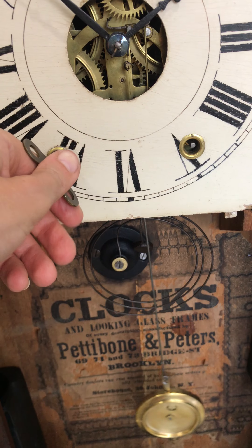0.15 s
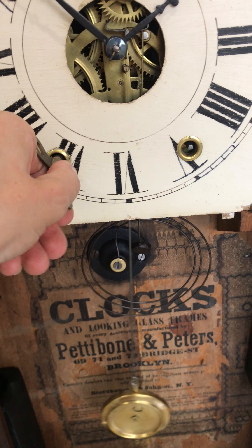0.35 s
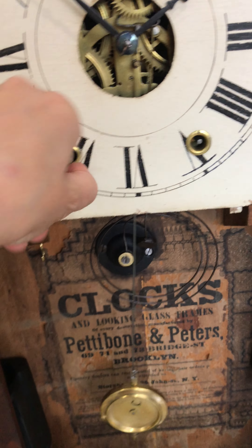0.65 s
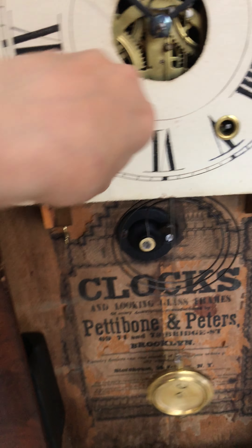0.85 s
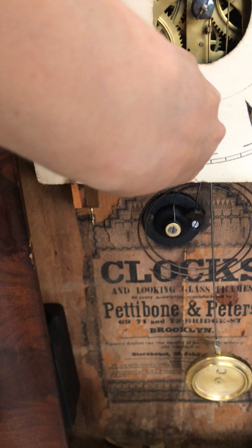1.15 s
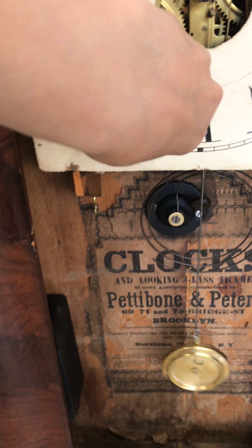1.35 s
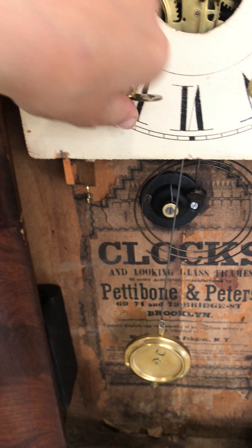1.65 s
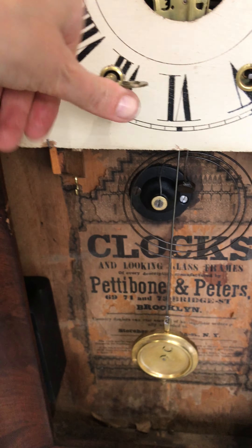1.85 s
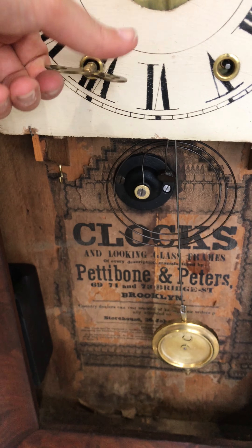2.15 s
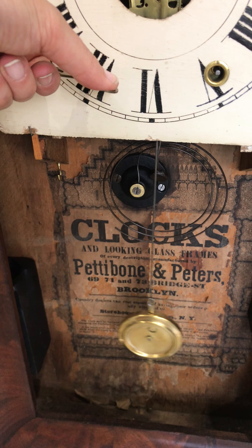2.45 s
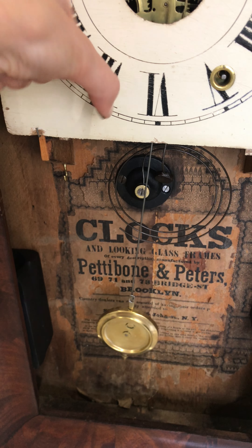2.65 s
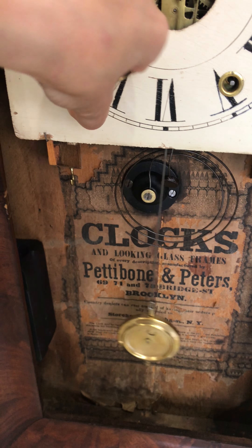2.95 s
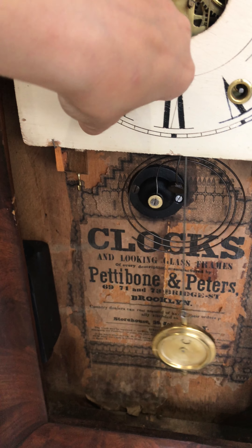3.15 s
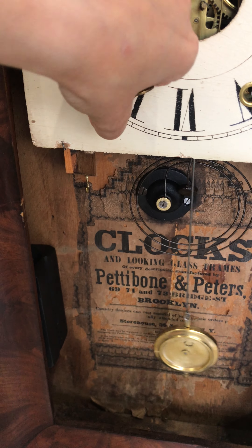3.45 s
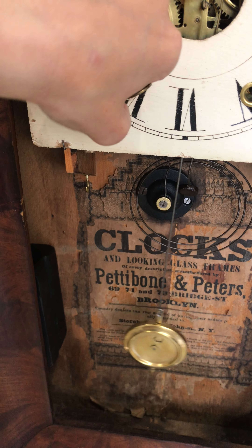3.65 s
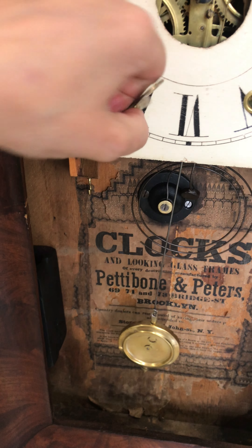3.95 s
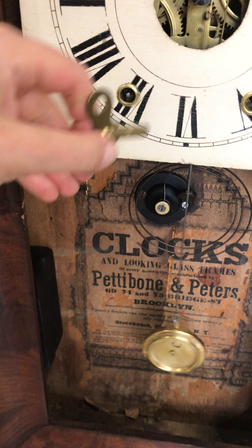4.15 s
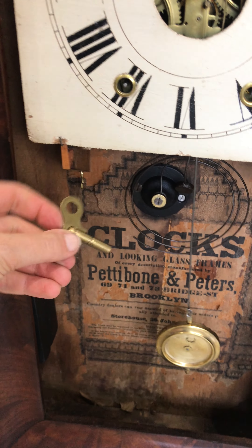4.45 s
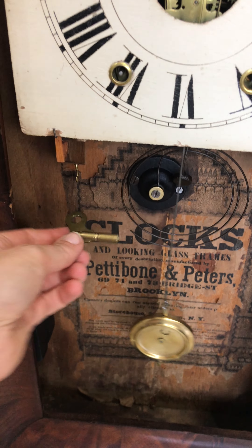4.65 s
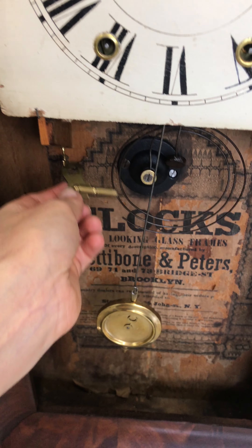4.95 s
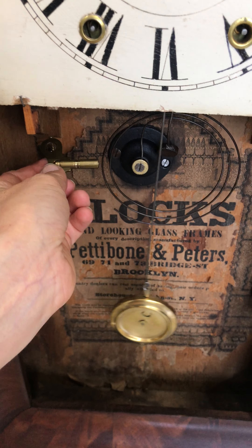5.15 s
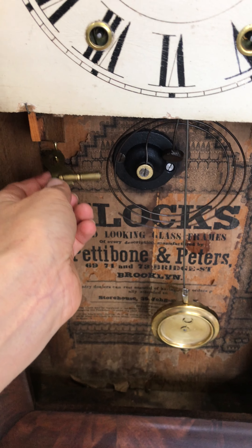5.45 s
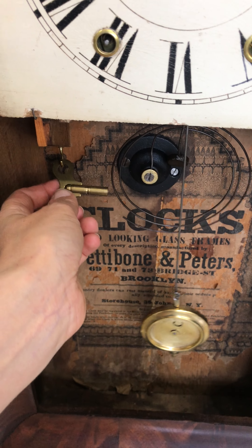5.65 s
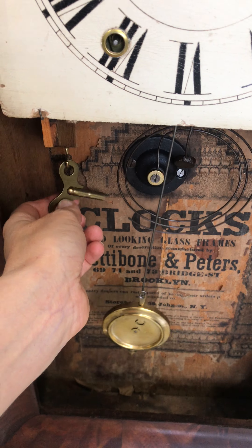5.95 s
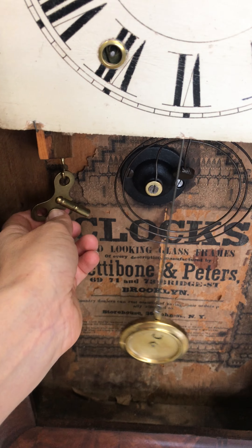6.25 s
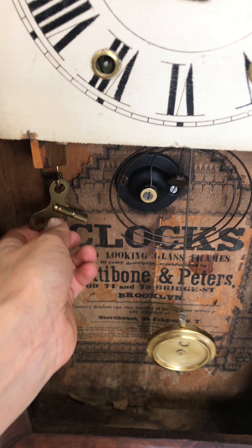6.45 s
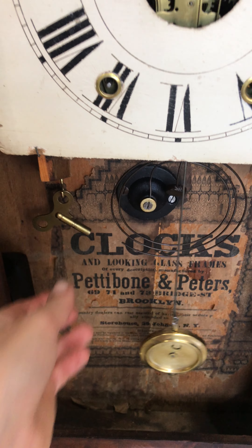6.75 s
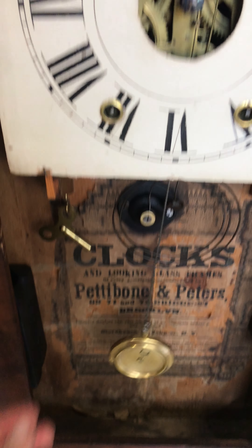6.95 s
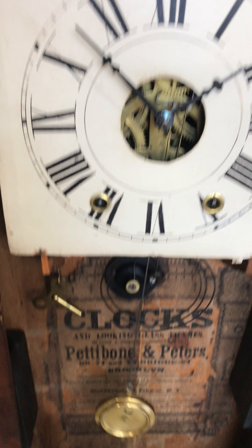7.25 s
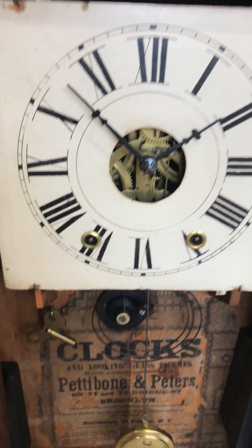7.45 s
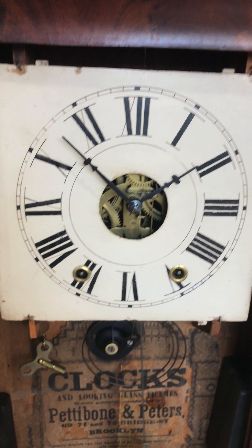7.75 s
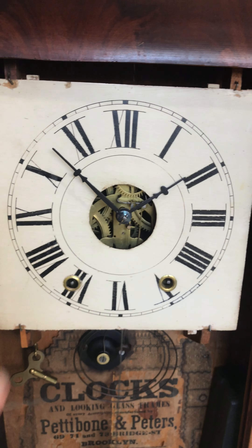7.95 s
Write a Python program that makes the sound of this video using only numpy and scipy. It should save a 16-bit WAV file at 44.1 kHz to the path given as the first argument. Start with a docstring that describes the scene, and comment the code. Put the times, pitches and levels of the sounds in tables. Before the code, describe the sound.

Close metallic knocks and rapid ratchet clicks from winding a wall clock, a sharp bang, then the key clinks and scrapes onto a hook.

```python
"""A key knocks on its arbor, close by, then an old pendulum wall clock ticks in a quiet room as it is wound.
The pawl clicks over the ratchet in two runs; after the second the loaded wheel falls back on it with a bang.
The key slides off and is hung with some scraping on a hook inside the wooden case.
Blows are damped sines plus dense decaying noise, friction is coloured noise and the squeak a wavering sine;
the case and the room answer with decaying noise echoes, over the rumble and hiss of the house."""
import sys
import numpy as np
from scipy import signal
from scipy.fft import rfft, irfft, next_fast_len
from scipy.io import wavfile
from scipy.ndimage import map_coordinates

SR = 44100
rng = np.random.default_rng(int(sys.argv[2]) if len(sys.argv) > 2 else 0)


def int16_out(signal):
    """Quantize to a 16-bit WAV file."""
    q = np.round(np.clip(np.atleast_2d(signal).T, -1, 1) * 32767)
    wavfile.write(sys.argv[1], SR, q.astype(np.int16))


N = 357632  # length in samples

# Resonances of the key on its arbor: pitch_hz, width_hz (before damping), peak_db (before random scatter)
KEY_MODES = [(197.5, 15, -7), (406, 110, 1), (880, 19, -9), (1146, 140, -5.5), (1740, 20, 1),
             (1895, 21, -7), (2102, 130, -11.5), (3200, 43, -14), (3760, 26, -27)]
# Spectrum of the key's dense weaker modes: pitch_hz, relative density_db
KEY_BODY = [(90, -40.5), (180, -6.5), (360, -1), (560, -11), (900, -7.5), (1750, -15.5), (2200, -16),
            (2800, -21.5), (4200, -24), (7000, -26.5), (10000, -32.5), (16000, -37)]


def amp(db):
    """Decibels to gain."""
    return 10 ** (np.asarray(db) / 20)


def unit(x):
    """Scale to rms 1."""
    return x / np.sqrt(np.mean(x ** 2) + 1e-20)


def along(points, hz):
    """Interpolate (Hz, value) points on a log frequency axis."""
    f, v = np.transpose(points)
    return np.interp(np.log(hz + 1), np.log(f + 1), v)


def level(spells, rise_db_per_s, fall_db_per_s):
    """Gain per sample: each spell swells, holds and dies away."""
    t = np.arange(N) / SR
    gain = np.zeros(N)
    for start, length, db in spells:
        before = np.maximum(start - t, 0)
        after = np.maximum(t - start - length, 0)
        gain += amp(db - rise_db_per_s * before - fall_db_per_s * after)
    return gain


def wobble(rate):
    """A smooth random curve, rate knots a second."""
    knots = rng.standard_normal(int(N * rate / SR) + 4)
    return map_coordinates(knots, [np.arange(N) * rate / SR])


def coloured(x, spectrum):
    """Pass x through a causal minimum-phase filter with the given (Hz, dB) spectrum."""
    size = 2 * next_fast_len(len(x) // 2 + 2048)
    gain = amp(along(spectrum, np.fft.rfftfreq(size, 1 / SR)))
    cepstrum = irfft(np.log(gain + 1e-6))
    # Folding the cepstrum onto positive time makes the filter causal
    cepstrum[1:size // 2] *= 2
    cepstrum[size // 2 + 1:] = 0
    return irfft(rfft(x, size) * np.exp(rfft(cepstrum)))[:len(x)]


def add(track, s, sound):
    """Mix a sound in at time s."""
    part = track[max(round(s * SR), 0):][:len(sound)]
    part += sound[:len(part)]


def shared(share, s, db, bright_db=0, thud=1):
    """A blow as (s, case dB, plates dB, steel dB); thud is the dB the wood gains per dB the steel loses."""
    wood, brass, steel = share
    return s, db + wood - thud * bright_db, db + brass, db + steel + bright_db


def blows(rows, modes, body, tone_db, damping_hz, detune, chatter, t60s, rise, lag, gain_db):
    """Each blow starts in the steel and reaches the brass plates and then the case a little later."""
    # Band edges between case, plates and steel: low_hz, high_hz
    split_hz = (600, 3000)
    bands = [(split_hz[0], "low"), (split_hz, "band"), (split_hz[1], "high")]
    filters = [signal.butter(4, edge, kind, fs=SR, output="sos") for edge, kind in bands]
    track, t = np.zeros(N), np.arange(SR // 5) / SR
    attack = t < .025  # only the first 25 ms of a blow are heard directly
    free = np.maximum(t - abs(chatter), 0)  # the parts chatter together before they ring freely
    hz, width, db = np.transpose(modes)[:, :, None]
    damped_width = width + damping_hz  # parts pressed together damp each other
    fading = np.exp(-np.pi * np.abs(damped_width) * free)
    for s, *levels in rows:
        strength = amp(db + rng.normal(0, 6, hz.shape)) * damped_width
        pitch = hz * (1 + detune * rng.standard_normal(hz.shape))  # the load on the parts keeps changing
        tones = np.sin(2 * np.pi * (pitch * t + rng.random(hz.shape)))
        ring = unit(np.sum(strength * fading * tones, axis=0))
        for sos, part_db, t60, delay in zip(filters, levels, t60s, (lag, lag / 2, 0)):
            burst = rng.standard_normal(len(t)) * np.exp(-np.log(1000) * free / t60)
            dense = unit(coloured(burst, body))
            swell = 1 - np.exp(-t / (rise + delay / 2))
            part = signal.sosfilt(sos, (dense + amp(tone_db) * ring) * swell)
            add(track, s + delay, amp(part_db + gain_db) * unit(part[attack]))
    return track


def ratchet():
    """The sprung pawl drops off tooth after tooth, in two turns of the key."""
    # Drops of the pawl: start_s, level_db (before shares and gain)
    clicks = [(0.678, -41.5), (0.763, -41.5), (0.852, -40), (0.926, -41), (1.013, -42.5), (1.088, -41.5),
              (1.163, -51), (2.649, -42), (2.707, -42.5), (2.754, -43.5), (2.809, -45.5), (2.87, -41),
              (2.925, -41.5), (2.986, -44), (3.0869, -44.5)]
    # Shares of a click: wood_db, brass_db, steel_db
    share = (-8, 0, 3.7)
    # Resonances of the pawl: pitch_hz, width_hz (before damping), peak_db (before random scatter)
    modes = [(613, 100, -1.5), (2120, 54, -3.5), (3750, 25, 3), (4050, 53, -1), (4370, 42, -13.5),
             (5349, 130, -2.5), (5640, 50, -6.5), (6042, 220, -6.5), (6360, 270, -1.5), (8800, 190, -13.5),
             (12100, 140, -10.5), (14400, 200, -22)]
    # Spectrum of its dense weaker modes: pitch_hz, relative density_db
    body = [(120, -30.5), (200, 7), (245, -12.5), (322, 5.5), (709, 1.5), (950, -9.5), (1370, -6.5),
            (1530, -11), (2130, -5.5), (2700, -17.5), (3690, -10), (4600, -11.5), (5840, -12.5),
            (7830, -23.5), (16000, -23.5)]
    return blows([shared(share, *click) for click in clicks], modes, body,
                 tone_db=-6.5, damping_hz=70, detune=0.012, chatter=0.0033,
                 t60s=(.11, .055, .018), rise=0.0035, lag=.004, gain_db=-1.0)


def wheel_catch():
    """The loaded wheel falls back on the pawl, which takes the whole load with a bang."""
    # Landings of the wheel: start_s, level_db (before shares)
    catches = [(3.0987, -22)]
    # Shares of the bang: wood_db, brass_db, steel_db
    share = (-10, 0, 4.5)
    # Resonances of the wheel: pitch_hz, width_hz (before damping), peak_db (before random scatter)
    modes = [(195, 25, -5.5), (323.96, 40, -2.5), (1020, 120, -5.5), (1470, 30, -7.5), (1696, 62, -1.5),
             (2415, 51, -3), (3416, 35, 0), (3570, 40, -5), (3670, 44, 1), (3860, 92, -2), (4450, 40, -8),
             (4534, 60, -15.5), (5188, 82, -20), (7650, 60, -24), (11598, 80, -29.5)]
    # Spectrum of its dense weaker modes: pitch_hz, relative density_db
    body = [(100, -35), (190, -4.5), (380, -8.5), (550, -16), (1050, -7), (1500, -7.5), (2050, -4),
            (2400, -3.5), (2900, -10), (3550, 2), (4400, -5), (5300, -13.5), (6300, -19), (7500, -16.5),
            (10000, -34.5), (11600, -25.5), (16000, -32.5)]
    return blows([shared(share, *row) for row in catches], modes, body,
                 tone_db=-7, damping_hz=30, detune=.002, chatter=0.0055,
                 t60s=(.07, .03, .02), rise=.0003, lag=.003, gain_db=0)


def spring_clunk():
    """The tightening spring shifts and jolts the arbor, which rings in the key's modes."""
    # Jolts: start_s, level_db (before shares and gain)
    clunks = [(0.9634, -29)]
    # Shares of a jolt: wood_db, brass_db, steel_db
    share = (-8.5, 0, -11)
    return blows([shared(share, *row) for row in clunks], KEY_MODES, KEY_BODY,
                 tone_db=2.5, damping_hz=35, detune=0.0038, chatter=0.0033,
                 t60s=(.06, .04, .03), rise=0.001, lag=.0015, gain_db=-0.4)


def key_on_arbor():
    """The key shifts on its arbor, dull through the fingers or bright metal on metal."""
    # Knocks of the key: start_s, level_db (before shares and gain), brightness_db
    knocks = [(0.0, -48, -10.5), (0.021, -48, -15), (0.251, -62, -19), (0.463, -43, -3.5),
              (0.483, -49.5, -1.5), (0.583, -72.5, 8), (1.289, -54.5, -6), (1.39, -60, -9),
              (1.585, -58, -10.5), (1.598, -46, -3.5), (1.656, -55.5, -3.5), (1.918, -54.5, -17.5),
              (1.998, -63, -13.5), (2.143, -64.5, -22.5), (2.188, -53.5, -13), (2.518, -51, -6),
              (2.529, -51.5, -5), (3.335, -65, -16), (3.58, -47.5, -1.5), (3.637, -58, -8),
              (3.908, -44.5, 2)]
    # Shares of a knock: wood_db, brass_db, steel_db
    share = (0, 0, 0)
    return blows([shared(share, *knock) for knock in knocks], KEY_MODES, KEY_BODY,
                 tone_db=-3.0, damping_hz=30, detune=0.012, chatter=0.0031,
                 t60s=(.06, .045, .033), rise=0.0026, lag=.002, gain_db=-1.34)


def jingle(count, dying_db_per_s, scatter_db, bright_db):
    """Small uneven clinks weaken on average as the key settles: (s, level dB, brightness dB)."""
    # The key skips as it drags: start_s, length_s, level_db (at the start, before decay and scatter)
    skips = [(5.47, 0.26, -57.5)]
    clinks = []
    for start, length, db in skips:
        for t in length * (np.arange(count) + rng.random(count)) / count:
            clinks.append((start + t, db - dying_db_per_s * t + rng.normal(0, scatter_db), bright_db))
    return clinks


def key_on_hook():
    """The key meets the hook in the case, skips along it and sways on it."""
    # Knocks on the hook: start_s, level_db (before shares and gain), brightness_db
    knocks = [(5.274, -36, 2), (5.518, -46, -1.5), (5.545, -47, -5), (5.574, -44, 0), (5.645, -54, -14),
              (5.707, -53.5, -12), (6.002, -44.5, -12.5), (6.327, -72, -11), (6.972, -65, -12)]
    # Shares of a knock: wood_db, brass_db, steel_db
    share = (-4.5, 0, -8)
    # Resonances of key and hook: pitch_hz, width_hz (before damping), peak_db (before random scatter)
    modes = [(359, 130, 0), (664, 150, -10), (1000, 54, 2), (1132, 82, 10.5), (1440, 46.2, -11),
             (1680, 30, -2.5), (1820, 40, -23), (3510, 60, -6), (3870, 95, -13), (5700, 90, -12)]
    # Spectrum of their dense weaker modes: pitch_hz, relative density_db
    body = [(150, -17.5), (330, -0.5), (530, -7.5), (700, -3.5), (900, -6.5), (1100, -1), (1550, -17),
            (1850, -7.5), (2100, -30), (3000, -20), (3700, -12.5), (5100, -24), (6000, -20), (9000, -32),
            (16000, -40)]
    clinks = knocks + jingle(count=18, dying_db_per_s=35, scatter_db=2.5, bright_db=-0.8)
    return blows([shared(share, *clink, thud=0.13) for clink in clinks], modes, body,
                 tone_db=-5.0, damping_hz=35, detune=0.0052, chatter=0.0043,
                 t60s=(.1, .05, .022), rise=0.00033, lag=0.0052, gain_db=1.44)


def rub(envelope, colour, uneven_db, gain_db):
    """Friction: a hiss of tiny slips under a pressure that keeps catching and letting go."""
    pressure = amp(uneven_db * (wobble(35) + wobble(250)))
    hiss = unit(coloured(rng.standard_normal(N) * pressure, colour))
    return amp(gain_db) * envelope * hiss


def hook_scrape():
    """The key's bow drags over the hook."""
    # Scrapes: start_s, length_s, level_db (before gain)
    scrapes = [(5.508, 0.053, -41.5)]
    # Spectrum of the scrape: pitch_hz, relative density_db
    colour = [(200, -25), (330, -1), (500, 4), (700, 10), (1200, 1), (1850, -7.5), (2400, -8.5),
              (3600, -17), (5000, -28), (6200, -24), (7500, -41), (15000, -73)]
    return rub(level(scrapes, rise_db_per_s=220, fall_db_per_s=96), colour, uneven_db=3.5, gain_db=-4.5)


def key_slide():
    """The key is drawn off the arbor, metal sliding on metal."""
    # Slides: start_s, length_s, level_db (before gain)
    slides = [(3.84, 0.08, -48.5)]
    # Spectrum of the slide: pitch_hz, relative density_db
    colour = [(150, -26), (350, -0.5), (900, -2.5), (1800, -9), (2250, -6.5), (2900, -21), (6000, -23),
              (8000, -29), (9700, -25), (11500, -32), (16000, -33)]
    return rub(level(slides, rise_db_per_s=500, fall_db_per_s=260), colour, uneven_db=2.5, gain_db=-3.5)


def hand_grip():
    """The hand bears on the case as it turns the key, then eases off."""
    # Spells of friction: start_s, length_s, level_db (before gain)
    grips = [(0.6, 0.43, -52.5), (1.33, 0.26, -56.5), (2.72, 0.2, -46.5), (3.3, 0.3, -53.5)]
    # Spectrum of the friction: pitch_hz, relative density_db
    colour = [(110, -32.5), (190, 2), (360, -0.5), (600, -5.5), (1500, -15), (4000, -27), (12000, -46.5)]
    return rub(level(grips, rise_db_per_s=110, fall_db_per_s=54), colour, uneven_db=2.5, gain_db=-3.5)


def squeak(s, hz, t60, db, waver):
    """A short faint squeak of wavering pitch as the key is pushed home."""
    track, t = np.zeros(N), np.arange(SR // 5) / SR
    pitch = hz * (1 + waver * wobble(360)[:len(t)])
    envelope = amp(db - 60 * t / t60) * (1 - np.exp(-t / 0.0039))
    add(track, s, envelope * np.sin(2 * np.pi * np.cumsum(pitch) / SR))
    return track


def escapement():
    """The two pallets stop the escape wheel in turn, slightly out of beat."""
    # Beats of the worn escapement, one per swing of the pendulum, each a little early or late: start_s
    beats = [0.411, 1.013, 1.517, 2.116, 2.603, 3.213, 3.715, 4.31, 4.813, 5.397, 5.906, 6.513, 7.0, 7.611,
             8.098]
    # The pallets take turns, a light tick and a fuller tock: level_db (before shares and gain), brightness_db
    pallets = [(-54.7, 1.5), (-50, -0.9)]
    # Shares of a tick: wood_db, brass_db, steel_db
    share = (-3.5, 0, -5.5)
    # Resonances of the ticking parts: pitch_hz, width_hz (before damping), peak_db (before random scatter)
    modes = [(337, 38, -2.5), (845, 60, -4), (1011, 30, -1), (1755, 100, -5.5), (1850, 50, -12),
             (2946, 190, -9.5), (3910, 110, -14.5), (5010, 36, -19), (5560, 80, -17), (6260, 60, -12),
             (7980, 54, -21), (11800, 66, -14.5), (12740, 60, -27)]
    # Spectrum of their dense weaker modes: pitch_hz, relative density_db
    body = [(120, -34), (200, -12), (330, -2), (650, -11), (880, -2), (1300, -9.5), (1680, -3.5),
            (2300, -15.5), (2950, -16.5), (3600, -23), (5400, -19.5), (9400, -32), (11900, -30),
            (16000, -31)]
    ticks = [shared(share, s, *pallets[k % 2], thud=0.54) for k, s in enumerate(beats)]
    return blows(ticks, modes, body, tone_db=-7, damping_hz=34.9, detune=0.0081, chatter=0.0077,
                 t60s=(.18, .06, .045), rise=0.0013, lag=0.0036, gain_db=1.36)


def case(x, t60, gap):
    """Sound rattles between the close walls of the open case; a fresh noise tail every eighth of a second."""
    wet, step, t = np.zeros(N), SR // 8, np.arange(SR // 4) / SR
    for start in range(0, N, step):
        tail = rng.standard_normal(len(t)) * np.exp(-np.log(1000) * t / t60) * (t > gap)
        add(wet, start / SR, signal.fftconvolve(x[start:start + step], tail / np.linalg.norm(tail)))
    return wet


def room(x, gap):
    """The walls answer after a short gap with decaying noise, drawn afresh every quarter second."""
    # Decay of the room by frequency: pitch_hz, t60_s
    decay = [(150, 0.54), (500, 0.6), (1500, 0.5), (3500, .6), (4500, .5), (7000, 0.56), (14000, 0.28)]
    wet, step = np.zeros(N), SR // 4
    for start in range(0, N, step):
        hz, t, z = signal.stft(rng.standard_normal(SR), SR, nperseg=256)
        fading = np.exp(-np.log(1000) * t / along(decay, hz)[:, None])
        tail = signal.istft(z * fading, SR, nperseg=256)[1]
        echo = signal.fftconvolve(x[start:start + step], tail / np.linalg.norm(tail))
        add(wet, start / SR + gap, echo)
    return wet


def air(rumble_db):
    """The low rumble and faint hiss of the house: coloured noise of slowly wavering level."""
    # Spectrum of the quiet house: pitch_hz, relative density_db
    colour = [(20, -34.5), (31, -15), (42, -3), (85, -3.5), (120, -7), (150, -18.5), (195, -13), (250, -25),
              (340, -21.5), (500, -29.5), (1000, -34), (2200, -42.5), (5000, -45.5), (10000, -51),
              (14000, -47), (16000, -50)]
    return amp(rumble_db + 0.51 * wobble(4)) * unit(coloured(rng.standard_normal(N), colour))


def scene():
    """The clock and its key, the case, the room around them and the quiet of the house."""
    winding = ratchet() + wheel_catch() + spring_clunk() + key_on_arbor() + key_on_hook()
    friction = hook_scrape() + key_slide() + hand_grip()
    clock = winding + friction + squeak(s=.212, hz=1980, t60=0.074, db=-47, waver=0.082) + escapement()
    reflected = coloured(clock, [(300, 5.0), (6000, -4), (14000, -5.0)])  # wood and walls swallow some treble
    echoes = amp(-8.0) * case(reflected, t60=0.11, gap=0.0054) + amp(-10.5) * room(reflected, gap=0.0086)
    return (clock + echoes + air(rumble_db=-55.5))[None]


def record(dry):
    """The microphone's signal keeps nothing above its band limit of 15950 Hz."""
    size = next_fast_len(N + SR // 2)
    kept = np.fft.rfftfreq(size, 1 / SR) < 15950
    return irfft(rfft(dry, size) * kept, size)[:, :N]


dry = scene()
out = record(dry)
int16_out(out)
```